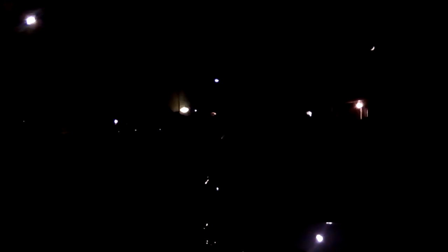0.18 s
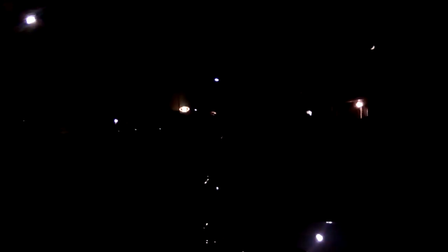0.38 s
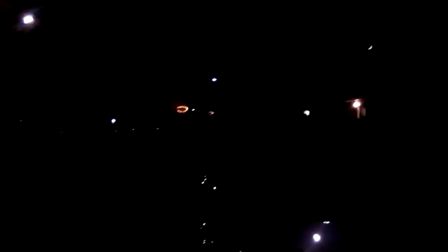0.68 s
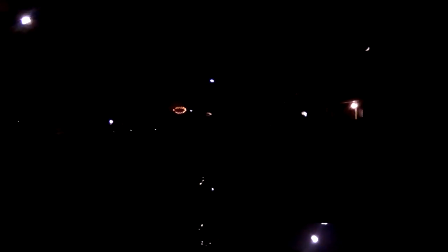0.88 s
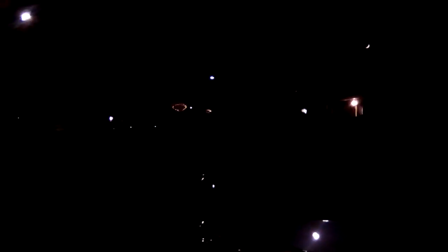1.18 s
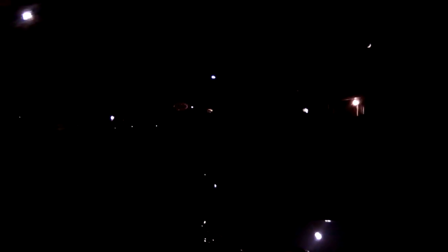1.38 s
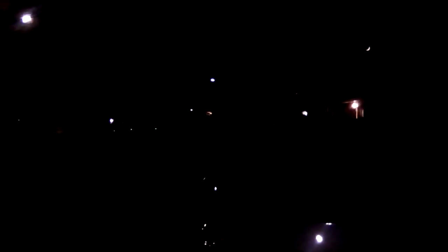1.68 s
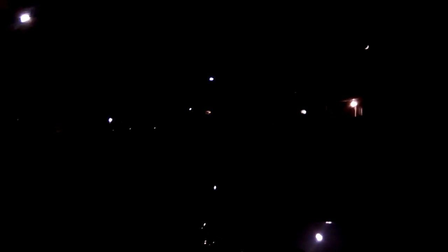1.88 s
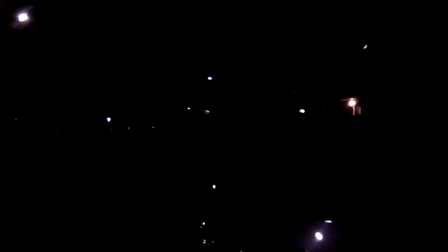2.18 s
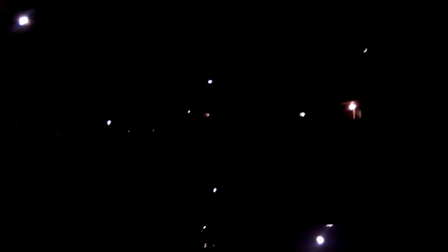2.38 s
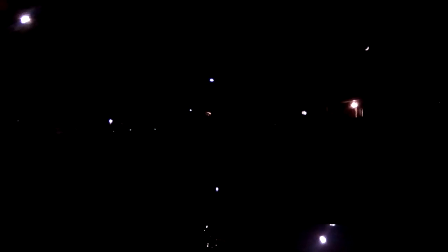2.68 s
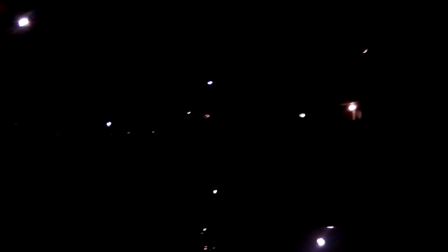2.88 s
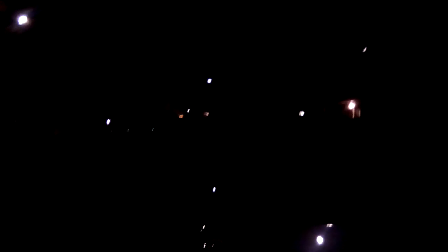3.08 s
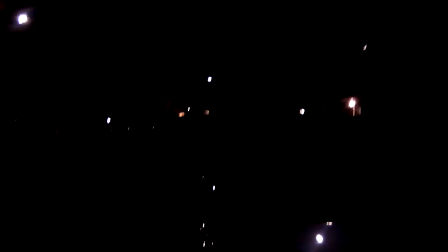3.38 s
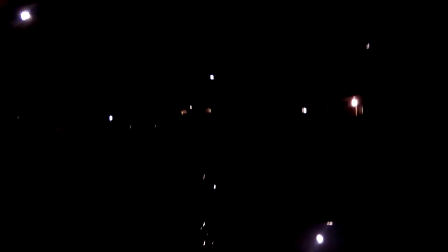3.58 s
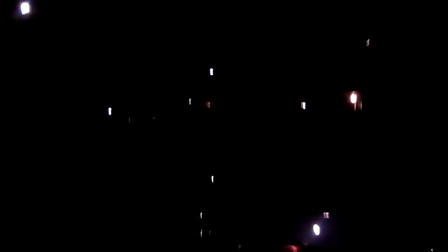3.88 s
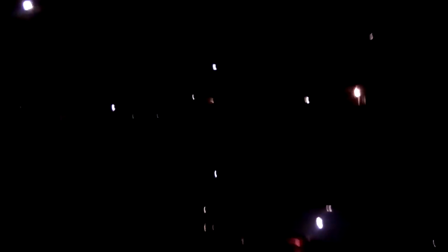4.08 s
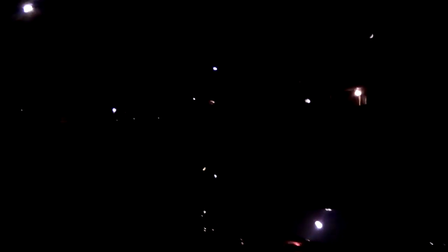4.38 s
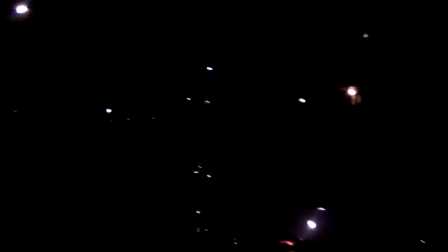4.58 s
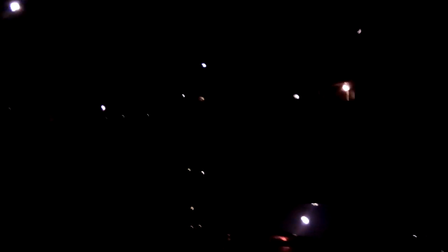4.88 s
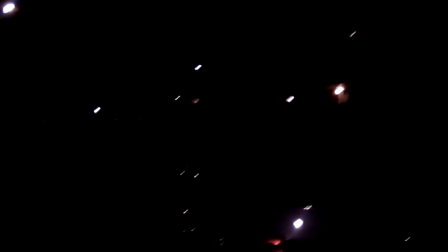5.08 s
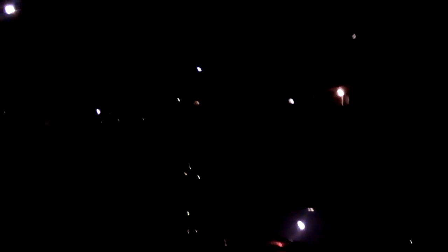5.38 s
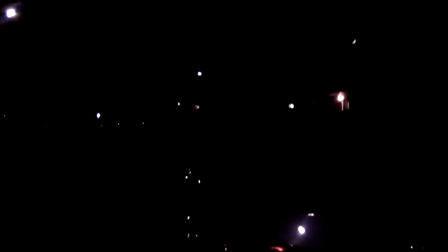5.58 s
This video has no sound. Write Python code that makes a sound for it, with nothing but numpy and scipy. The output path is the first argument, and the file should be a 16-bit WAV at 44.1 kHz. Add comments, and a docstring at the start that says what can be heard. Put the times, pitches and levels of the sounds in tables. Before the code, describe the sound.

Three distant firework bangs, near the start, middle and end, with dull pops and soft thumps over a low rumbling night background.

```python
"""Booms with a thud, crack and snap: fireworks far across a town at night, heard by a phone outdoors.
Three bangs, two with a small forerunner, ring damped sines, again off a wall, then scatter as noise.
Duller pops are decaying noise; soft thumps and knocks are short sines. A dry tick and faint whistles join.
Behind: throbbing noise bands of other shows and town, wavering machine tones, a whine, coloured hiss."""
import sys
import numpy as np
from scipy import signal
from scipy.fft import rfft, irfft, next_fast_len
from scipy.io import wavfile
from scipy.ndimage import uniform_filter1d

SR = 44100
rng = np.random.default_rng(int(sys.argv[2]) if len(sys.argv) > 2 else 0)


def materialize(psi):
    """Save the field psi as 16-bit PCM at rate SR to the path in sys.argv[1].

    A 1-D psi becomes a single channel; in a 2-D psi each row is a channel.
    """
    bounded = np.clip(np.atleast_2d(psi).T, -1, 1)
    quanta = np.round(bounded * 32767).astype(np.int16)
    wavfile.write(sys.argv[1], SR, quanta)


N = 250664

# fronts of three near bangs, the first two each with a small forerunner:
# start_s, level_db, extra_path_km, wall_db, wall_treble_db, echo_db, boom_echo_db,
# snap_echo_db, boom_db, boom_hz, boom_width_hz, top_hz
BANG_FRONTS = [(0.1203, -20.5, 0.11, -15, 1, 0.5, 2, -2.5, 1, 113, 60, 3000),
               (0.122, -16, 0.0086, -8.5, 6, 4.5, 3, 1.5, -2.5, 111, 34, 2750),
               (2.5621, -32, 0.22, 3, -4, -1, -1, -3, 4.5, 132, 55, 2720),
               (2.5639, -23.5, 0.45, -6.5, -8, -2, 2.5, 10, 1, 130, 55, 2600),
               (4.9467, -11, 0.19, -3, 7.5, -3, -5.5, -6, -1.5, 111, 71, 2600)]
# parts of a burst, boom to sizzle: pitch_hz, width_hz, wall_db, echo_db, echo_t60_s, far_echo_db
BURST_PARTS = [(113.5, 56, -0.5, -23, 0.49, -32), (312, 188, -4, -24, 0.11, -36),
               (540, 260, 3.5, -7, 0.21, -20), (1152, 314, 1, -26.5, 0.16, -33.5),
               (2154, 237, -14, -27, 0.089, -49.5), (2820, 250, -15, -23, 0.053, -41)]
# per part: level_db
PART_LEVELS_DB = [-2, 2, -27.5, -8.5, -12.5, -23]
# per part: loss_db_per_km, more for the higher parts
AIR_LOSS_DB_PER_KM = [0, 2.1, 5, 10.1, 16., 20]
# per part: sign of the front; the thud first sucks, then the others push
FRONT_SIGNS = [1, -1, 1, 1, 1, 1]
# bands cancelled by the ground bounce: centre_hz, width_hz
GROUND_NOTCHES = [(840, 45), (1760, 110)]
WALL_DELAY_S, PUSH_DELAY_S = 0.0335, 0.0011
FAR_T60_S, ECHO_RISE_S, SMEAR_RISE_S = 1.11, 0.0019, 0.011
BLUR_S_PER_KM = 0.0004  # a longer path rounds the front off

# duller pops, some along with a thump: start_s, level_db, treble_fall_db_per_octave, t60_s
DULL_POPS = [(1.387, -44.5, 10, 0.11), (1.526, -50.5, 8.5, 0.29), (1.799, -52, 6.5, 0.23),
             (1.978, -53, 18, 0.061), (2.0917, -47, 8.5, 0.094), (2.117, -70.5, -3.5, 0.19),
             (2.153, -51.5, 8, 0.18), (2.219, -59, 10.5, 0.33), (2.302, -46.5, 16, 0.07),
             (2.809, -56, 24, 0.062), (2.868, -54, 19, 0.087), (5.117, -60, 15, 0.25)]
# bands of their echoes: centre_hz, width_hz, level_db
POP_BANDS = [(564, 190, -2), (780, 330, -7.5), (1047, 310, .5), (1360, 310, -4), (1538, 390, .5),
             (1884, 190, -2), (2300, 670, 2.5), (2600, 200, -3.5), (2880, 490, -9)]
POP_TAIL_DB, POP_TAIL_T60_S, POP_TOP_HZ, POP_GRAIN_DB = -28, 0.46, 3200, 3.5

# distant booms and thud echoes of the last bang: start_s, level_db, pitch_hz, rise_s, rumble_db
SOFT_THUMPS = [(0.601, -36, 112, 0.0078, -14.5), (0.742, -35, 125, 0.0034, -24),
               (1.377, -48, 99, 0.013, -5), (1.377, -39, 241, 0.0036, -7), (1.848, -31, 119, 0.003, -14),
               (2.244, -36.5, 130, 0.003, -15), (2.302, -23.5, 103, 0.005, -14.5),
               (2.579, -36.5, 125, 0.0051, -11), (2.8063, -31.5, 231, 0.003, -12.5),
               (2.8677, -36.5, 403, 0.0011, -9.5), (3.034, -27.5, 121, 0.0055, -14.5),
               (3.953, -32.5, 119, 0.0093, -16.5), (4.074, -32.5, 72, 0.0078, -24),
               (4.219, -31.5, 140, 0.0082, -10), (4.2411, -40, 142, 0.0093, -16),
               (4.26, -37.5, 146, 0.0057, -13), (4.307, -31.5, 92, 0.0052, -17),
               (4.413, -40.5, 102, 0.0079, -6), (4.9715, -33, 325, 0.0038, -6.5),
               (4.9885, -26, 490, 0.0021, -13), (4.998, -32.5, 370, 0.0031, -12),
               (5.071, -36.5, 152.6, 0.013, -7.5), (5.637, -39.5, 173, 0.0025, -1.5)]
# rumble after a thump: centre_hz, width_hz, level_db
RUMBLE_BANDS = [(127, 120, -1.5), (300, 246, -6)]
RUMBLE_DELAY_S, RUMBLE_T60_S = 0.0082, 0.25

# dry tick: start_s, level_db, bass_db
TICKS = [(3.8472, -38, -39)]
# passband of the tick: low_hz, high_hz
TICK_EDGES_HZ = (1950, 3300)
TICK_HZ, TICK_WIDTH_HZ, TICK_BASS_LEAD_S = 2390, 510, 0.004
TICK_TAIL_DB, TICK_T60_S = -19, 0.2

# faint hisses and whistles: start_s, length_s, first_hz, last_hz, width_hz, level_db
WHISTLES = [(1.204, 0.13, 2410, 2550, 200, -66.5), (1.234, 0.075, 2660, 2700, 90, -70),
            (1.252, 0.086, 2370, 2380, 50, -71), (1.282, 0.051, 2590, 2590, 25, -68),
            (1.309, 0.165, 2540, 2590, 50, -74), (1.404, 0.1, 2410, 2380, 50, -73),
            (1.249, 0.14, 1610, 1620, 500, -71), (2.081, 0.13, 5500, 5500, 2500, -72.5),
            (1.905, 0.074, 2660, 2700, 80, -79), (1.954, 0.14, 1220, 1210, 300, -67.5),
            (2.795, 0.16, 1060, 1063, 348, -63.5), (3.049, 0.066, 2820, 2820, 450, -74),
            (3.881, 0.12, 2710, 2650, 120, -74.5), (3.955, 0.11, 5700, 5700, 350, -78),
            (3.972, 0.11, 1895, 1850, 600, -69.5), (3.966, 0.1, 780, 780, 120, -68),
            (4.0, 0.09, 4800, 4800, 350, -77.5), (4.296, 0.25, 1290, 1078, 220, -67),
            (4.259, 0.43, 2810, 2440, 420, -73.5), (4.306, 0.19, 4900, 4930, 350, -78.5),
            (4.44, 0.064, 780, 780, 80, -71), (4.531, 0.17, 990, 1067, 90, -68.5)]
WHISTLE_WIDTH_HZ = 51  # narrower than this, a steady tone outweighs the hiss
SWELL_SKEW = 0.89  # under 1 the swell peaks early

# swell of the further shows: time_s, rumble_db, thud_db, knock_db, wash_db
AFAR_SWELL = [(0.0, -42.5, -52.5, -62.5, -64.5), (0.16, -53, -58, -72, -79.5), (0.32, -51.5, -50, -62, -66),
              (0.6, -43, -56.5, -56, -69.5), (0.81, -48.5, -55.5, -61, -74.5),
              (1.07, -47, -55.5, -64, -72.5), (1.45, -50, -56, -66, -68), (1.88, -49.5, -58, -65, -69.5),
              (2.23, -46, -58, -67.5, -69), (2.83, -44.5, -52, -64, -71), (3.4, -50, -61.5, -74, -73),
              (3.75, -50.5, -58, -71.5, -72.5), (4.19, -45, -60.5, -73.5, -71.5),
              (4.54, -48, -59, -74, -73), (4.65, -46.5, -57.5, -79.5, -73), (4.899, -47.5, -55, -65, -72.5),
              (5.129, -45, -53.5, -57.5, -67.5), (5.68, -51, -56.5, -65, -73.5)]
# bands of rumble, thud, knock, wash: centre_hz, width_hz, level_db
AFAR_BANDS = ([(58.3, 32, -5.5), (92, 39.7, 1), (154.5, 88, -3.5)], [(264, 160, 2.5), (404.4, 158, 0)],
              [(535.5, 83, 2), (652.5, 112, -2.5)], [(800, 190, -1.5), (964, 170, -1), (1124, 160, 0),
              (1290, 160, -1.5), (1448, 140, -6), (1648, 250, -5.5), (1963, 360, -9), (2254, 350, -13),
              (2710, 510, -12.5)])
# shared throb: rumble_db, thud_db, knock_db, wash_db
THROB_DB = [1.2, 2, 2.8, 2.27]
# flicker of each band alone: rumble_db, thud_db, knock_db, wash_db
FLICKER_DB = [0.5, 2.53, 3, 3.2]

# machine tones: pitch_hz, level_db relative to load
MACHINE_LINES = [(285, -7), (307, -4.5), (355, -0.5), (377, 0.5), (473, -1.5)]
# machine load: time_s, level_db
MACHINE_LOAD = [(0, -63), (0.5, -61), (0.9, -60), (1.35, -68.5), (1.6, -68.5), (2.4, -61), (3.2, -66),
                (3.5, -66), (4.1, -67), (4.25, -70.5), (4.5, -62.5), (5.68, -62.5)]
# whine tones: pitch_hz, level_db
WHINE_LINES = [(6449, -90), (12898, -104)]
# hiss colour: freq_hz, relative_db_per_hz
HISS_COLOUR = [(1500, 4), (3000, 3.5), (4500, 2.5), (6200, 4), (8000, -7.5), (13800, -7.5), (15200, 3.5),
               (17500, 0.5)]
# bands of hiss that waver in level: centre_hz, width_hz, flicker_db
HISS_PATCHES = [(3330, 470, 3), (3900, 330, 3.5), (4440, 400, 3.5), (4980, 400, 4), (5500, 350, 4),
                (5900, 380, 3.5), (15500, 3000, 0.5)]
HISS_DB, TOP_HZ = -75, 17050


def undb(db):
    """Gain of a level in dB."""
    return 10 ** (np.asarray(db) / 20)


def unit(x):
    """Scaled to rms 1."""
    return x / np.sqrt(np.mean(x ** 2))


def lowpass(x, order, cut_hz):
    """Butterworth low-pass."""
    return signal.sosfilt(signal.butter(order, cut_hz, fs=SR, output="sos"), x)


def band(x, hz, width_hz):
    """A resonance applied twice for steep skirts."""
    b, a = signal.iirpeak(hz, hz / width_hz, fs=SR)
    return signal.lfilter(b, a, signal.lfilter(b, a, x))


def double_band(x, hz, width_hz):
    """A band followed by one twice as wide."""
    return band(band(x, hz, width_hz), hz, 2 * width_hz)


def clicks(start_s, db):
    """Single samples at the given times."""
    out = np.zeros(N)
    at = np.minimum(np.asarray(start_s) * SR, N - 1).astype(int)
    np.add.at(out, at, undb(db))
    return out


def fade(x, t60_s):
    """Every click dies away exponentially."""
    return signal.lfilter([1], [1, -np.exp(-np.log(1000) / (t60_s * SR))], x)


def late(x, rise_s):
    """Edges spread over the next rise_s."""
    k = max(int(rise_s * SR), 1)
    return signal.lfilter(np.ones(k) / k, [1], x)


def walk(rate_hz):
    """Random levels held 1 / rate_hz and slewed twice; spread near 1."""
    k = int(SR / rate_hz)
    held = np.repeat(rng.standard_normal(N // k + 1), k)
    slewed = uniform_filter1d(uniform_filter1d(held, k), k)
    return unit(slewed[:N])


def ring(x, hz, width_hz, rise_cycles=0.2):
    """Every click starts a damped sine of its own size with a rounded onset."""
    t = np.arange(SR // 10) / SR
    onset = (1 - np.exp(-t * hz / rise_cycles)) ** 2
    shape = onset * np.exp(-np.pi * width_hz * t) * np.sin(2 * np.pi * hz * t)
    return signal.oaconvolve(x, shape / np.abs(shape).max())[:N]


def echoes(envelope, hz, width_hz, grain_db=3):
    """Band noise under an envelope, roughened by random fine grains."""
    grain = grain_db * walk(150) + grain_db / 2 * walk(45)
    noise = rng.standard_normal(N) * undb(grain)
    return double_band(envelope * noise, hz, width_hz) / double_band(noise, hz, width_hz).std()


def bang(start_s, level_db, path_km, wall_db, wall_treble_db, echo_db, boom_echo_db, snap_echo_db,
         boom_db, boom_hz, boom_width_hz, top_hz):
    """A pressure front rings each part, returns off the wall and scatters off houses near and far."""
    out, blur_s = 0, BLUR_S_PER_KM * path_km
    rows = zip(PART_LEVELS_DB, AIR_LOSS_DB_PER_KM, FRONT_SIGNS, BURST_PARTS)
    for i, (part_db, loss_db, sign, part) in enumerate(rows):
        hz, width_hz, part_wall_db, near_db, t60_s, far_db = part
        is_boom, is_treble = i == 0, i >= 4  # treble: snap and sizzle
        at_s = start_s + (PUSH_DELAY_S if sign > 0 else 0)
        db = level_db + part_db - loss_db * path_km
        front = clicks([at_s], db)
        bounce_db = db + wall_db + part_wall_db + is_treble * wall_treble_db
        both = front + clicks([at_s + WALL_DELAY_S], bounce_db)

        near_db = near_db + echo_db + is_boom * boom_echo_db + is_treble * snap_echo_db
        scatter = undb(near_db) * fade(both, t60_s) + undb(far_db) * fade(front, FAR_T60_S)

        blurred = late(late(both, blur_s), blur_s)
        if is_boom:
            rung = undb(boom_db) * ring(blurred, boom_hz, boom_width_hz)
        else:
            rung = ring(blurred, hz, width_hz)
        out = out + sign * rung + echoes(late(scatter, ECHO_RISE_S), hz, 2.48 * width_hz)
    # each bang has its own upper limit
    return lowpass(out, 12, top_hz)


def bangs():
    """All bangs and forerunners; the bounce off the ground cancels two bands."""
    out = sum(bang(*row) for row in BANG_FRONTS)
    for hz, width_hz in GROUND_NOTCHES:
        out = signal.lfilter(*signal.iirnotch(hz, hz / width_hz, fs=SR), out)
    return out


def pops():
    """Duller pops: scattered noise echoes, some along with a thump; level changes octave by octave."""
    out = 0
    for hz, width_hz, band_db in POP_BANDS:
        octaves = np.log2(hz / POP_BANDS[0][0])
        starts, smear = 0, 0
        for start_s, db, fall_db, t60_s in DULL_POPS:
            start = clicks([start_s - SMEAR_RISE_S / 2], db + band_db - fall_db * octaves)
            starts = starts + start
            smear = smear + fade(start, t60_s)
        smear = smear + undb(POP_TAIL_DB) * fade(starts, POP_TAIL_T60_S)
        out = out + echoes(late(smear, SMEAR_RISE_S), hz, width_hz, POP_GRAIN_DB)
    return lowpass(out, 8, POP_TOP_HZ)


def thumps():
    """Soft thumps and knocks: short swelling sines, with a rumble of noise echoes behind."""
    out, t = np.zeros(N + SR), np.arange(SR // 8) / SR
    for start_s, db, hz, rise_s, _ in SOFT_THUMPS:
        shape = (t / rise_s) * np.exp(1 - t / rise_s)
        at = int(start_s * SR)
        out[at:at + len(t)] += undb(db) * shape * np.sin(2 * np.pi * hz * t)
    start_s, db, _, _, rumble_db = np.transpose(SOFT_THUMPS)
    starts = clicks(start_s + RUMBLE_DELAY_S, db + rumble_db)
    envelope = late(fade(starts, RUMBLE_T60_S), SMEAR_RISE_S)
    rumble = sum(undb(band_db) * echoes(envelope, hz, width_hz, grain_db=2.0)
                 for hz, width_hz, band_db in RUMBLE_BANDS)
    return out[:N] + rumble


def tick():
    """A narrow click with a small boom under it and a short noise tail."""
    start_s, db, bass_db = TICKS[0]
    narrow = signal.butter(5, TICK_EDGES_HZ, "band", fs=SR, output="sos")
    click = signal.sosfilt(narrow, band(clicks([start_s], 0), TICK_HZ, TICK_WIDTH_HZ))
    noise = signal.sosfilt(narrow, rng.standard_normal(N))
    envelope = late(fade(clicks([start_s], db + TICK_TAIL_DB), TICK_T60_S), ECHO_RISE_S)
    boom_hz, boom_width_hz = BURST_PARTS[0][:2]
    boom = ring(clicks([start_s - TICK_BASS_LEAD_S], bass_db), boom_hz, boom_width_hz)
    return undb(db) * click / np.abs(click).max() - boom + envelope * unit(noise)


def fizz():
    """Narrow noise plus a tone on a gliding carrier, under a swell."""
    out = np.zeros(N)
    for start_s, length_s, first_hz, last_hz, width_hz, db in WHISTLES:
        part = np.linspace(0, 1, int(length_s * SR))
        # the last samples, once the filter has settled
        real, imag = lowpass(rng.standard_normal((2, SR)), 2, width_hz / 2)[:, -len(part):]
        rough = (real + 1j * imag) * np.sqrt(SR / width_hz / 2)
        steady = WHISTLE_WIDTH_HZ / width_hz
        pitch_hz = first_hz + (last_hz - first_hz) * part
        carrier = np.exp(2j * np.pi * np.cumsum(pitch_hz) / SR)
        swell = np.sin(np.pi * part ** SWELL_SKEW)
        at = int(start_s * SR)
        out[at:at + len(part)] += undb(db) * swell * ((rough + steady) * carrier).real
    return out


def afar():
    """Overlapping booms of other shows and the town: bands that throb together and flicker alone."""
    out, throb = 0, walk(15)
    time_s, *levels = np.transpose(AFAR_SWELL)
    for level_db, bands, throb_db, flicker_db in zip(levels, AFAR_BANDS, THROB_DB, FLICKER_DB):
        layer = 0
        for hz, width_hz, band_db in bands:
            noise = unit(double_band(rng.standard_normal(N), hz, width_hz))
            layer = layer + undb(band_db + throb_db * throb + flicker_db * walk(12)) * noise
        swell_db = np.interp(np.arange(N) / SR, time_s, level_db)
        out = out + undb(swell_db) * unit(layer)
    return out


def tones(lines, waver_db, drift_hz):
    """Sines that waver in level and drift a little in pitch."""
    out = 0
    for hz, db in lines:
        phase = 2 * np.pi * np.cumsum(hz + drift_hz * walk(6)) / SR
        out = out + undb(db + waver_db * walk(4.99)) * np.sqrt(2) * np.sin(phase)
    return out


def machine():
    """Hum of a machine: wavering tones that follow its load."""
    load_db = np.interp(np.arange(N) / SR, *np.transpose(MACHINE_LOAD))
    return undb(load_db) * tones(MACHINE_LINES, waver_db=3.5, drift_hz=2.197)


def whine():
    """High tones of constant level that drift in pitch."""
    return tones(WHINE_LINES, waver_db=0.0, drift_hz=3.3)


def hiss():
    """Coloured background hiss; some bands of it waver in level independently."""
    hz, db = np.transpose(HISS_COLOUR)
    size = next_fast_len(N)
    bins_hz = np.arange(size // 2 + 1) * SR / size
    colour = undb(np.interp(np.log(bins_hz + 1), np.log(hz), db))
    noise = irfft(rfft(rng.standard_normal(size)) * colour, size)[:N]
    flicker = sum((undb(depth_db * walk(11)) - 1) * band(noise, centre_hz, width_hz)
                  for centre_hz, width_hz, depth_db in HISS_PATCHES)
    return undb(HISS_DB) * unit(noise + flicker)


def scene():
    """Everything at the one microphone."""
    fireworks = bangs() + pops() + thumps()
    background = afar() + machine() + whine() + hiss()
    return (fireworks + tick() + fizz() + background)[None]


def record(dry):
    """The phone cuts the deep bass and the top."""
    thin = signal.sosfilt(signal.butter(3, 50.0, "high", fs=SR, output="sos"), dry)
    return signal.sosfilt(signal.ellip(10, 0.2, 70, TOP_HZ, fs=SR, output="sos"), thin)


dry = scene()
out = record(dry)
materialize(out)
```